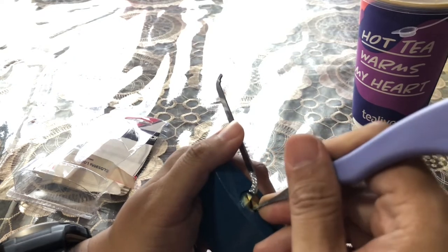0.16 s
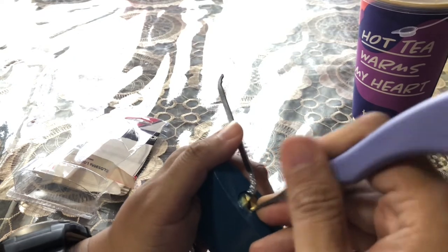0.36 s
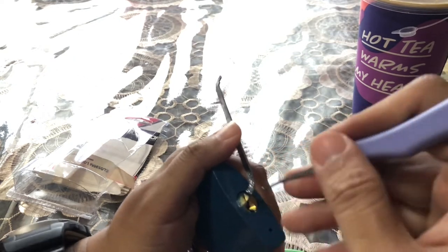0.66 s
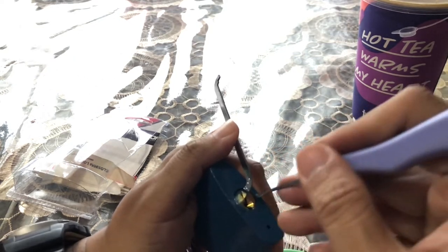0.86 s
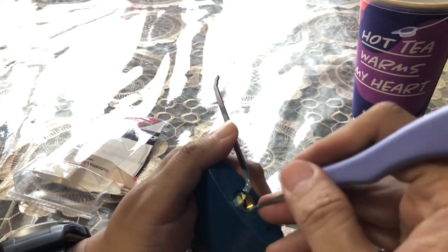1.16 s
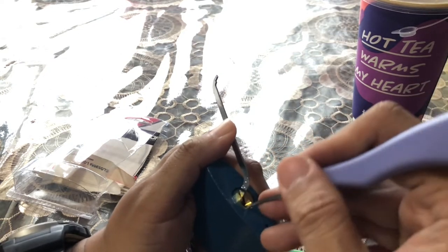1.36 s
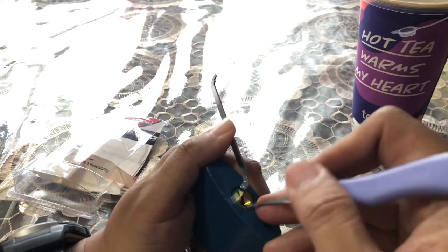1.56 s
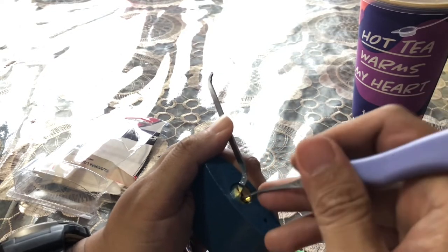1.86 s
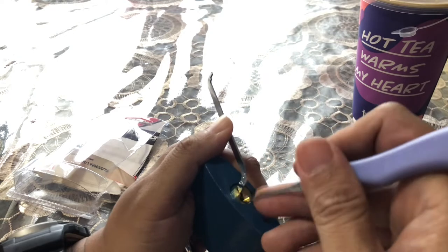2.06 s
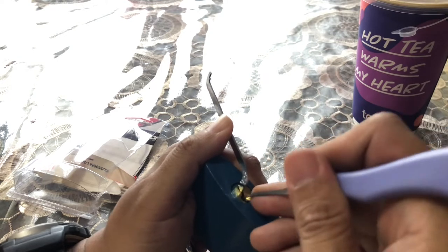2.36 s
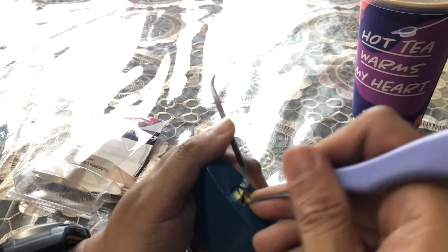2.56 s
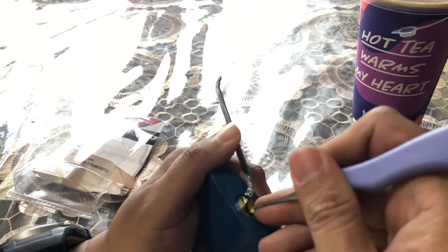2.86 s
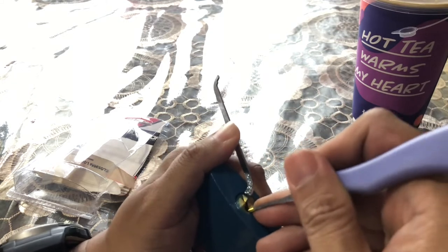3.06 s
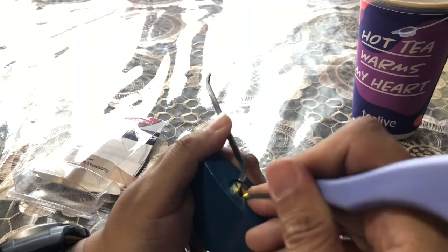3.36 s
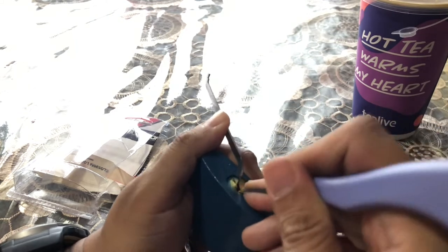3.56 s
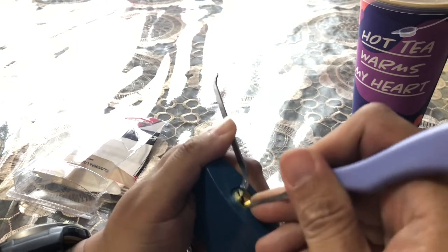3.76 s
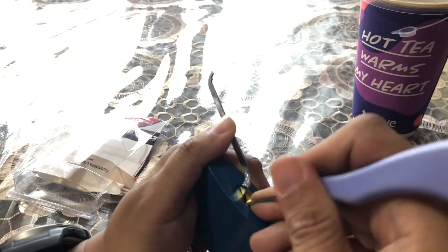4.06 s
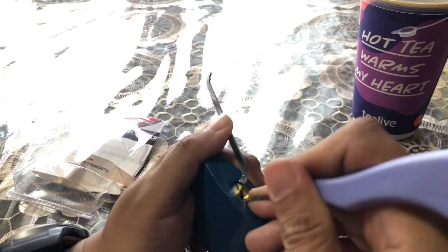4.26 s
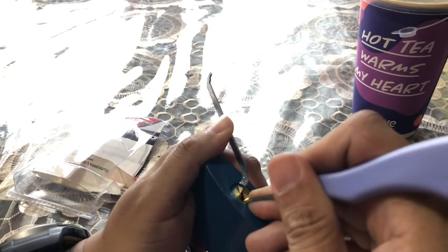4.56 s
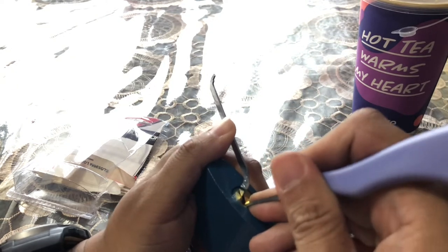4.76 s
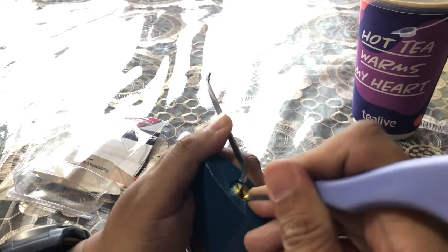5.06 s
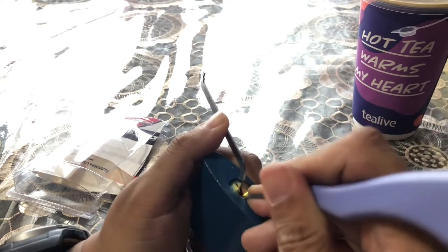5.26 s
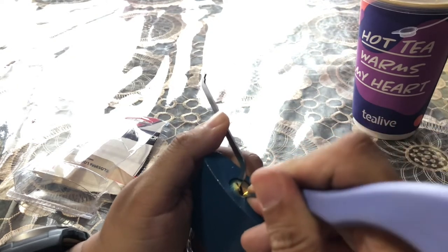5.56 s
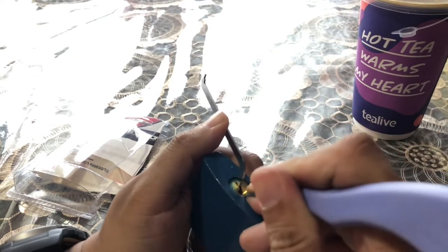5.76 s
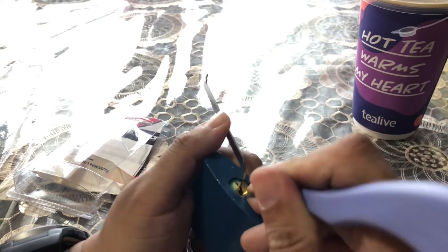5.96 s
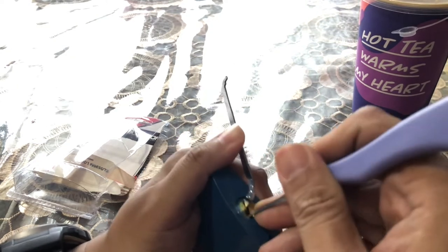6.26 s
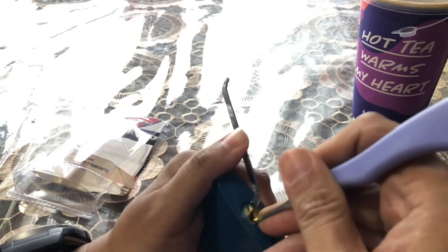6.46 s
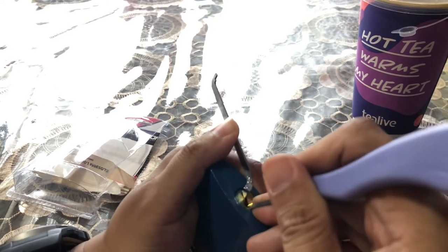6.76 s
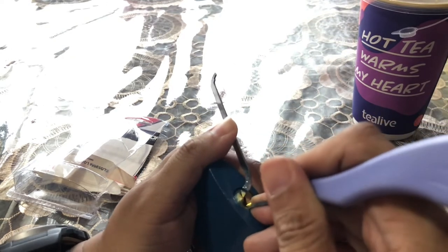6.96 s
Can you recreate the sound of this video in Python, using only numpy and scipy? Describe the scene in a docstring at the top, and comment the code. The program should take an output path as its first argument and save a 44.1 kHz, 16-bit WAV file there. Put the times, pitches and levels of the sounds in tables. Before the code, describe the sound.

A steel pick clicks and scrapes irregularly inside a hand-held padlock, close and bright, with soft table thuds and a low fan hum.

```python
"""A small room, the microphone close to a hand-held padlock whose pins are worked with a steel pick.
The clicks and short scrapes are nearly dry and very bright: sharp contacts and tiny burrs ring damped steel modes.
The hands nudge the table, whose soft low thuds glide down over a rumble; a fan adds coloured noise and unsteady tones.
Far off, a bird whistles faintly three times: gliding sines, blurred by many reflections."""
import sys
import numpy as np
from scipy import signal
from scipy.fft import rfft, irfft, next_fast_len
from scipy.io import wavfile
from scipy.ndimage import uniform_filter1d, map_coordinates

SR = 44100
rng = np.random.default_rng(int(sys.argv[2]) if len(sys.argv) > 2 else 0)


def store_pcm(level_fs):
    """Save levels as 16-bit WAV."""
    pcm = np.round(np.clip(level_fs, -1, 1) * 32767).astype(np.int16)
    wavfile.write(sys.argv[1], SR, np.atleast_2d(pcm).T)


N = 314433  # samples

# pick and pins strike, close to the microphone; both levels are trimmed in clicks():
# start_s, level_db (above 10 kHz), body_rel_db (lock body, relative to level_db), slip_s
CLICKS = [(0.11, -49, 1, .0006), (.1294, -32.5, -1.5, 0.0025), (0.547, -33, -6, 0.0032),
          (.56, -29.5, -4.5, 0.0069), (0.5776, -25.5, -7.5, 0.0019), (.5859, -37, -7, 0.0034),
          (.9365, -49.5, 4, .0006), (.956, -46, 1.5, 0.0037), (.9672, -36.5, -5.5, .0004),
          (1.0714, -45, -0.5, 0.0033), (1.194, -41, -9, .003), (1.21, -36.5, -12, 0.0015),
          (1.225, -46, -9, .0005), (1.304, -36.5, -4, 0.0072), (1.3474, -50.5, 4.5, .0015),
          (1.4885, -47, -9, 0.0028), (1.564, -49.5, -5, .0005), (1.6288, -32, -10, 0.0027),
          (1.6352, -22.5, -10.5, 0.003), (1.6407, -29.5, -8.5, 0.0056), (1.6472, -27, -12, 0.0034),
          (1.684, -36.5, -8, 0.0041), (1.8248, -42, -7, 0.0017), (1.877, -51, -2, 0.0013),
          (2.0571, -29, -11.5, 0.001), (2.2844, -43, -2, 0.00085), (2.3293, -41, -4.5, 0.0051),
          (2.4837, -33, 1.5, 0.0051), (2.4893, -34.5, -1, 0.0029), (2.889, -45.5, -4.5, .0007),
          (2.8984, -40, -5.5, 0.0029), (3.146, -37, -5, 0.00033), (3.1854, -39, -10.5, .0005),
          (3.3712, -20, -2.5, 0.00078), (3.3813, -21, -1.5, .0004), (3.3842, -17.5, -10, .004),
          (3.389, -19, -10, .0006), (3.6363, -42, -4.5, .0005), (3.6534, -40.5, 4, .0006),
          (3.718, -42.5, -2.5, .0004), (3.791, -44, -14, .0017), (3.844, -39, -10, 0.0011),
          (3.971, -52, -9, .0006), (4.3356, -56, -3.5, 0.0011), (4.3606, -59, 5.5, 0.0026),
          (4.7353, -31.5, -8, 0.0023), (5.233, -31.5, -0.5, 0.00082), (5.2384, -16.5, -13, 0.00016),
          (5.2417, -18, -12, .0009), (6.056, -37, -8.5, 0.0016), (6.203, -48, -6, 0.0031),
          (6.292, -28.5, -6.5, 0.0053), (6.403, -55, 1.5, .0008), (6.662, -21, -8.5, 0.0024)]


def clicks(pin_db=1, body_db=-1.04, chatter=0.69, tilt_db=-1.0, tilt_db_per_s=1.5, slip_dull_db_per_ms=0.57):
    """A sharp contact, then micro-impacts as the pick slips; long slips are duller, later clicks brighter."""
    out = np.zeros(N)
    t = np.arange(SR // 80) / SR
    millisecond = SR / 1000  # in samples
    contacts = []
    for slip_s in np.transpose(CLICKS)[3]:
        skid = rng.standard_normal(len(t)) ** 3 * np.exp(-(t / slip_s) ** 2)  # cubing makes it spiky
        slip_ms = slip_s * SR / millisecond
        force = chatter * slip_ms * skid / np.linalg.norm(skid)
        force[0] += 1  # the first contact
        contacts.append(np.convolve(force, steel_ring()))
    pins = band(contacts, 10000, 15900)
    bodies = band(contacts, 1450, 10000)
    for (s, db, rel_db, slip_s), pin, body in zip(CLICKS, pins, bodies):
        slip_ms = slip_s * SR / millisecond
        pin = brighten(pin, tilt_db + tilt_db_per_s * s - slip_dull_db_per_ms * slip_ms)
        for sound, level_db in ((pin, db + pin_db), (body, db + rel_db + body_db)):
            packed = sound * np.sqrt(millisecond / np.sum(sound ** 2))  # level: energy as if packed in 1 ms
            add(out, s, amp(level_db) * packed)
    return out


# ringing modes of pick, pins and lock body: pitch_hz, level_db, t60_s
STEEL = [(2070, -16.5, .003), (3600, -13.5, 0.0046), (5190, -12.5, 0.0061), (7060, -4, 0.0024),
         (8640, -2.5, 0.0027), (10200, -6, 0.001966), (11740, -4.5, 0.0048), (12500, -4, 0.0048),
         (13550, -0.5, 0.0035), (14860, 3, 0.0032)]


def steel_ring(spread_db=2.5, detune=0.024, crack=0.84, crack_s=0.00064, bounce=0.1, bounce_s=0.00088):
    """One contact: a crack and a ring that the fingers damp at once, then its bounce off the table."""
    t = np.arange(SR // 100) / SR
    hz, db, t60 = np.transpose(STEEL)[:, :, None]
    size, shift, phase = rng.standard_normal((3, len(STEEL), 1))  # every contact point favours other modes
    decay = amp(db + spread_db * size - 60 * t / t60)
    modes = decay * np.sin(2 * np.pi * (hz * (1 + detune * shift) * t + phase))
    hiss = signal.lfilter([1, -0.6], [1], rng.standard_normal(len(t)))
    onset = 1 - np.exp(-t / 0.000085)
    ring = (modes.sum(axis=0) + crack * hiss * np.exp(-t / crack_s)) * onset
    return ring + bounce * np.pad(ring, (round(bounce_s * SR), 0))[:len(t)]


def brighten(sound, tilt_db):
    """Tilt the top octave, by tilt_db from 11.5 to 14.5 kHz."""
    hz = np.fft.rfftfreq(len(sound), 1 / SR)
    slope = np.clip((hz - 11500) / 3000, -0.5, 1.2)
    return irfft(rfft(sound) * amp(tilt_db * slope), len(sound))


# the pick slides along the keyway; levels are trimmed in scrapes(): middle_s, length_s, level_db
SCRAPES = [(.10, 0.078, -56), (.179, 0.11, -59.5), (.295, 0.057, -59), (0.562, 0.054, -42),
           (0.958, 0.02, -49), (1.037, 0.21, -60), (1.205, 0.035, -47), (1.283, 0.054, -59.5),
           (1.344, 0.029, -58), (1.468, .04, -57), (1.658, .075, -54), (1.759, .015, -58),
           (1.809, .027, -59), (2.051, 0.026, -47), (2.277, 0.021, -56), (2.597, .03, -63.5),
           (2.895, .023, -51), (3.03, 0.13, -71), (3.699, 0.088, -63), (3.791, .04, -56),
           (6.071, 0.047, -59), (6.504, .05, -67)]


def scrapes(burrs_per_s=900, grain_db=5, level_db=-1, catch_rate=90, catch_db=5.5):
    """Sliding steel sticks and slips over tiny burrs, each of which rings the lock."""
    out = np.zeros(N)
    t = np.arange(-SR // 8, SR // 8) / SR
    for s, length, db in SCRAPES:
        chance, size = rng.random(len(t)), rng.standard_normal(len(t))
        catching = catch_db * wobble(catch_rate)[:len(t)]
        burrs = (chance < burrs_per_s / SR) * amp(grain_db * size + catching)
        grit = signal.fftconvolve(burrs, steel_ring())[:len(t)]
        stroke = swell(t, length)
        rub = unit(grit * stroke) * np.sqrt(np.mean(stroke ** 2))
        add(out, s + t[0], amp(db + level_db) * rub)
    return out


LIGHT_WORK_S = 3  # until then the pick feels its way lightly


def ticks(count=28, level_db=-52, spread_db=3):
    """Springs and pins tick faintly at random moments while the pick feels its way."""
    out = np.zeros(N)
    for place, size in zip(rng.random(count), rng.standard_normal(count)):
        ring = steel_ring()
        add(out, place * LIGHT_WORK_S, amp(level_db + spread_db * size) * ring / np.abs(ring).max())
    return out


# the hands knock the table, levels trimmed in table(): peak_s (when the push is strongest), level_db, pitch_hz (then)
THUDS = [(1.07, -35.5, 129), (1.175, -40.5, 196.6), (1.93, -39, 175.4), (2.009, -35.5, 122),
         (2.378, -43.5, 178.3), (3.004, -42, 121), (3.604, -40.5, 188), (3.864, -42.5, 148),
         (4.5, -35, 221), (4.537, -34.5, 121), (4.595, -36.5, 141.4), (4.735, -37, 130.3),
         (4.836, -23.5, 169.5), (4.968, -32, 195.4), (5.088, -30.5, 101), (5.149, -37, 135.6),
         (5.657, -42, 154.7), (5.723, -42.5, 187.5), (5.877, -39.5, 185.7), (6.397, -37.5, 175.7),
         (6.429, -38.5, 223.5), (6.599, -36, 125)]
# colour of the hands' rumble, only its shape counts: pitch_hz, level_db (per Hz)
RUMBLE = [(20, -18), (35, -7), (55, 5), (100, 0.5), (180, -7.5), (300, -17), (600, -38.5), (1500, -80)]
# the hands shift their grip on the lock, levels trimmed in table() and nudges(): middle_s, length_s, level_db
GRIPS = [(1.04, 0.1206, -43), (1.98, .14, -45.5), (2.76, .12, -48.5), (3.56, 0.19, -48), (3.93, .12, -52),
         (4.57, 0.16, -43.5), (4.85, .11, -34.5), (5.08, 0.23, -44.5), (5.6, .12, -50.5),
         (5.87, 0.112, -44.5), (6.1, 0.054, -45.5), (6.45, .12, -43.5), (6.68, 0.15, -43),
         (6.91, 0.061, -47.5)]
RESTING_DB = -62.5  # the hands between shifts of grip, trimmed with the rumble


def table(thud_db=1.0, rumble_db=-6, travel_s=0.045, rise_s=0.008, fall_s=0.009, shake=0.3):
    """Bending waves carry higher tones faster, so each thud glides down; the shifting hands rumble under them."""
    out = np.zeros(N)
    t = np.arange(-SR // 40, SR // 10) / SR  # 0 at the peak of the push
    age = np.maximum(1 + t / travel_s, 0.1)
    shifts = sum(amp(db) * swell(np.arange(N) / SR - s, length) for s, length, db in GRIPS)
    effort = amp(RESTING_DB) + shifts
    rumble = effort * amp(rumble_db + 2.86 * wobble(14)) * noise(RUMBLE)
    shudder = noise([(30, -19), (70, 0.5), (170, 2.5), (330, -1), (500, -9.5), (700, -28.0), (1500, -63)])
    for peak_s, db, hz in THUDS + nudges():
        cycles = -hz * travel_s / age  # the pitch falls as 1 / time squared
        push = np.exp(-np.abs(t / np.where(t < 0, rise_s, fall_s)) ** 1.03)
        push = push * np.minimum((t - t[0]) / 0.0093, 1)  # starts from silence
        add(out, peak_s + t[0], amp(db + thud_db) * push * np.sin(2 * np.pi * (cycles + rng.random())))
    # the top shakes on after each thud
    motion = np.sqrt(np.abs(uniform_filter1d(out ** 2, SR // 16, origin=SR // 100)))
    return out + shake * motion * shudder + rumble


def nudges(per_s=20, level_db=1, spread_db=2, pitch_hz=160, pitch_spread=0.17):
    """A shift of grip bumps the table lightly at uneven moments: rows like those of THUDS."""
    rows = []
    for s, length, db in GRIPS:
        bumps = max(round(per_s * length), 1)
        places = (np.arange(bumps) + rng.random(bumps)) / bumps - 0.5
        for place, (size, tone) in zip(places, rng.standard_normal((bumps, 2))):
            bump_db = db + level_db + spread_db * size
            rows.append((s + place * length, bump_db, pitch_hz * np.exp(pitch_spread * tone)))
    return rows


# the room's echo of the lock, band by band: low_hz, high_hz, level_db, t60_s
ROOM = [(1500, 4330, -12.5, 0.366), (4500, 10500, -19.5, 0.276), (10080, 13200, -20.5, 0.18),
        (12920, 15900, -22, 0.23)]


def room(x, delay_s=0.003):
    """Diffuse echo: each band stores the energy it is fed and lets it die away as an uneven hiss."""
    out = np.zeros(N)
    for lo_hz, hi_hz, db, t60 in ROOM:
        keep = amp(-120 / (t60 * SR))  # energy left after one sample
        stored = signal.lfilter([1 - keep], [1, -keep], band(x, lo_hz, hi_hz) ** 2)
        hiss = unit(band(rng.standard_normal(N), lo_hz, hi_hz))
        add(out, delay_s, amp(db + 1.5 * wobble(120)) * np.sqrt(stored) * hiss)
    return out


def near_wall(x, delay_s=0.0085, level_db=-29):
    """One nearby surface sends a single faint copy of the lock back to the microphone."""
    return amp(level_db) * np.pad(x, (round(delay_s * SR), 0))[:N]


# colour of the fan's rush, only its shape counts: pitch_hz, level_db (per Hz)
AIR = [(20, -32), (45, -8), (80, 0.5), (170, -0.5), (310, 1.5), (480, -7), (620, -9), (780, -8),
       (1050, -12.5), (1750, -16), (2200, -22.5), (4500, -30), (7500, -37.5), (16000, -38.5)]
# the fan's tones: pitch_hz, level_db
HUM = [(124, -79.5), (312, -68), (399, -64)]


def fan(rush_db=-54, drift=0.121):
    """A steady rush of air, as coloured noise, with a few slightly unsteady sine tones."""
    t = np.arange(N) / SR
    tones = np.zeros(N)
    for hz, db in HUM:
        tones += amp(db + 1.3 * wobble(3)) * np.sin(2 * np.pi * (hz * t + drift * wobble(4.6)))
    return amp(rush_db + 1.0 * wobble(6.4)) * noise(AIR) + tones


# far whistles, each glides to a pitch and holds it; levels are trimmed in bird():
# start_s, length_s, glide_s, first_hz, last_hz, level_db
WHISTLES = [(3.866, 0.13, .125, 3550, 2955, -61.5), (4.11, .215, .06, 4350, 3660, -63),
            (4.43, 0.14, .03, 3330, 3390, -60)]


def bird(level_db=-1, quaver=0.0068, edge_db=-13):
    """Thin quavering sines, each loudest towards its middle."""
    out = np.zeros(N)
    for s, length, glide, first_hz, last_hz, db in WHISTLES:
        t = np.arange(round(length * SR)) / SR
        pitch = np.interp(t, [0, glide], [first_hz, last_hz]) * (1 + quaver * wobble(67)[:len(t)])
        level = db + level_db + edge_db * np.abs(2 * t / length - 1) + 1.4 * wobble(44)[:len(t)]
        tone = np.sin(2 * np.pi * np.cumsum(pitch) / SR)
        add(out, s, amp(level) * signal.windows.tukey(len(t), 0.15) * tone)
    return out


def distant(x, wet_db=-3, t60=0.74):
    """Many faint reflections, as decaying noise, blur a far sound."""
    t = np.arange(SR // 3) / SR
    tail = rng.standard_normal(len(t)) * amp(-60 * t / t60)
    return x + amp(wet_db) * signal.fftconvolve(x, tail / np.linalg.norm(tail))[:N]


def amp(db):
    """Decibels to gain."""
    return 10 ** (np.asarray(db) / 20)


def unit(x):
    """Scale to rms 1."""
    return x / np.sqrt(np.mean(x ** 2) + 1e-20)


def swell(t, length):
    """A smooth rise and fall around t = 0."""
    return np.exp(-(2 * t / length) ** 2)


def along(points, hz):
    """(pitch_hz, value) points read on a log frequency axis."""
    f, v = np.transpose(points)
    return np.interp(np.log(hz + 1), np.log(f + 1), v)


def wobble(rate):
    """A smooth random curve, rate knots a second."""
    step = np.arange(0, N + 64, 64)  # computed every 64 samples, straight lines between
    knots = rng.standard_normal(int(N * rate / SR) + 4)
    return np.interp(np.arange(N), step, map_coordinates(knots, [step * rate / SR]))


def filtered(x, response):
    """x times a response of frequency."""
    m = next_fast_len(N + SR // 2)
    return irfft(rfft(x, m) * response(np.fft.rfftfreq(m, 1 / SR)), m)[:N]


def band(x, lo_hz, hi_hz):
    """Causal band-pass."""
    edges = np.clip([lo_hz, hi_hz], 10, SR / 2 - 10)
    return signal.sosfilt(signal.butter(4, edges, "band", fs=SR, output="sos"), x)


def noise(spectrum):
    """Coloured noise of rms 1."""
    return unit(filtered(rng.standard_normal(N), lambda hz: amp(along(spectrum, hz))))


def add(track, s, sound):
    """Mix a sound into the track from time s."""
    i = max(round(s * SR), 0)
    part = track[i:i + len(sound)]
    part += sound[:len(part)]


def scene():
    """The near lock is almost dry; the bird is blurred by distance."""
    lock = clicks() + scrapes() + ticks()
    echoes = near_wall(lock) + room(lock)
    return (lock + echoes + table() + fan() + distant(bird()))[None]


TOP_HZ = 16050  # the recorder's band limit


def record(dry):
    """The recorder cuts steeply above its band limit."""
    return filtered(dry[0], lambda hz: 1 / np.sqrt(1 + (hz / TOP_HZ) ** 120))[None]


dry = scene()
out = record(dry)
store_pcm(out)
```